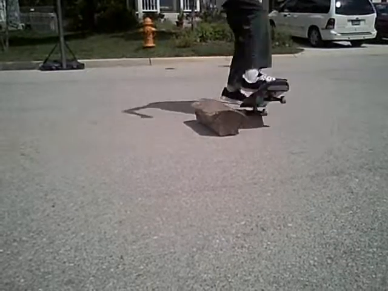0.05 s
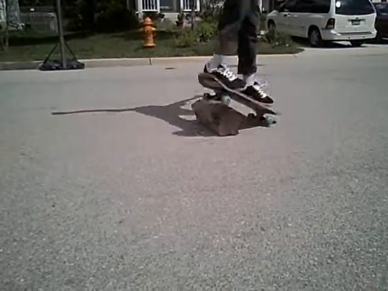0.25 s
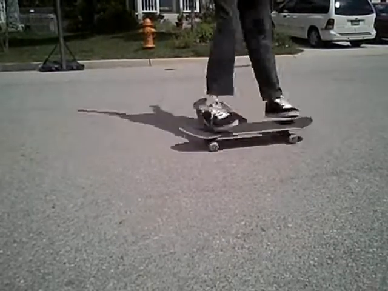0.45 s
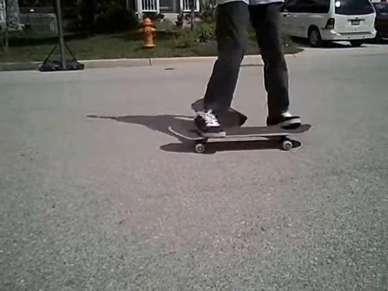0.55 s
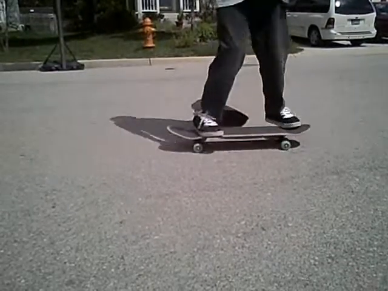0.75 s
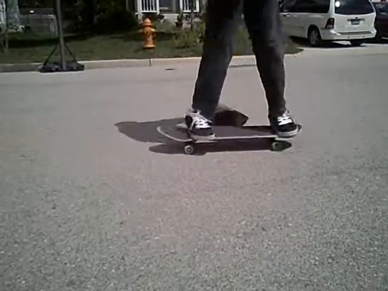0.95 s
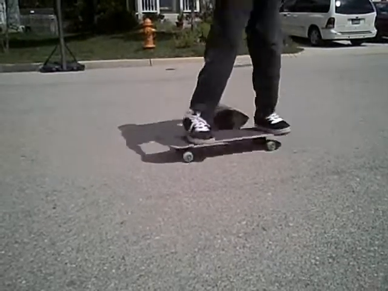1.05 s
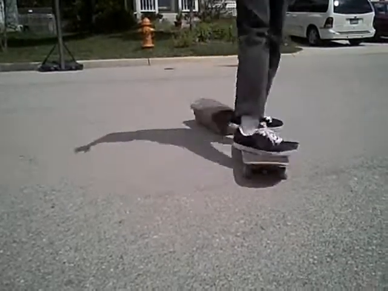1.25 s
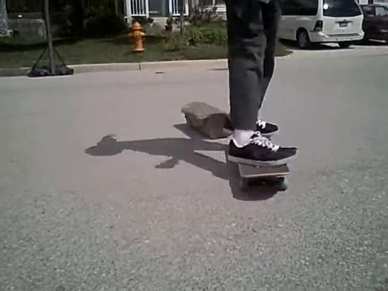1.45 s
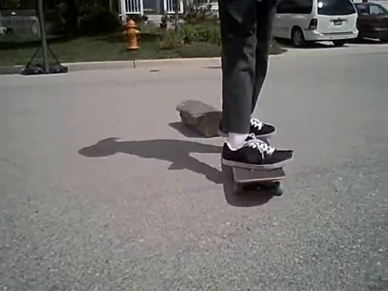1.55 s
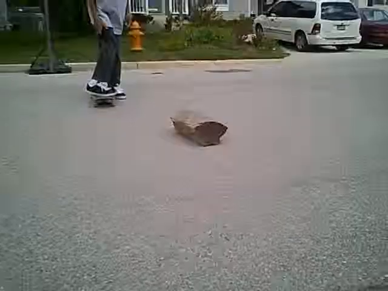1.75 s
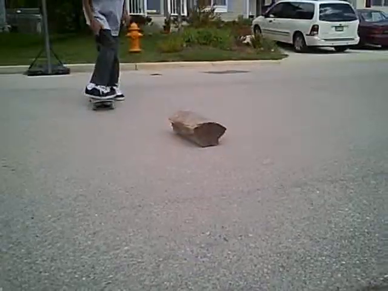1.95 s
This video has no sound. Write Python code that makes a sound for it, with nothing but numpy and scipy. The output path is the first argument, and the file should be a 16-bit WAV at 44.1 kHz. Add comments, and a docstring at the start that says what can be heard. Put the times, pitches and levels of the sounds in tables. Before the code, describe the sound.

A skateboard clacks against a log, slams down, skids and rolls on over gritty asphalt.

```python
"""Skateboard at a log, asphalt street.

Close on one small microphone, a board rolls up to a log, clacks against it, slams down and skids round. It
rolls on slowly over crackling grit, knocks twice more and carries on. Every contact is a rattle of tiny impacts
that rings the wooden deck, and the big hits overload the microphone. Behind it is a faint echo off houses and
parked cars, and throughout runs the low hum of a small motor."""
import sys
import numpy as np
from scipy import signal
from scipy.fft import rfft, irfft
from scipy.io import wavfile

SR = 44100
rng = np.random.default_rng(int(sys.argv[2]) if len(sys.argv) > 2 else 0)


def transcribe(signal):
    """Save signal, clipped to [-1, 1], as a 16-bit WAV file at the path in sys.argv[1]."""
    frames = np.atleast_2d(signal).T
    limited = np.clip(frames, -1, 1)
    pcm = np.round(limited * 32767).astype(np.int16)
    wavfile.write(sys.argv[1], SR, pcm)


N = 88200
TOP_HZ = 15650  # upper edge of the microphone's range

# low modes of the wooden deck (frequency [Hz], relative level [dB], t60 [s])
DECK_MODES = [(255, -1, 0.039), (333.2, -5, .04), (428, 1.5, 0.06), (566.6, 3, 0.052), (660, -5.5, 0.025),
              (840, -6, 0.08), (924, 1.5, 0.077), (968, -1, 0.041), (1067, -1, 0.055), (1173, -5.5, 0.08),
              (1290, -9, .06)]
# high modes of deck and trucks (frequency [Hz], relative level [dB], t60 [s])
CLACK_MODES = [(1560, -5.5, 0.066), (1680, -6, 0.099), (1884.5, -4, 0.098), (1966, -0.5, 0.048),
               (2099, 1.5, 0.023), (2140, -3, 0.033), (2430, -1.5, 0.021), (2820, -22, .05),
               (2705, -5.5, 0.03), (2930, -9.5, .05), (3312, -7, .06), (3410, -12.5, .04),
               (4660, -15.5, .04)]
# board and rider bouncing on the wheels (frequency [Hz], relative level [dB], t60 [s])
THUD_MODES = [(137, -3.5, 0.042), (165, -2, .07), (231.6, 10, 0.023)]
# spectrum of skidding and of cracking stones (frequency [Hz], relative level [dB])
SKID_COLOUR = [(60, -20), (150, -6), (350, -14.5), (560, -3.5), (750, -8), (1300, -6.5), (2000, -1),
               (3300, 1), (5000, 2.5), (8000, 0), (10000, -6), (15000, -4)]


def knocks():
    """Each blow, one hard contact and a dying rattle, rings the board and thuds on the wheels."""
    # blows on the board (time [s], crack [dB], deck ring [dB], clack [dB], thud [dB], rattle decay [s])
    blows = [(.203, -33, -33, -37, -39, 0.0052), (0.2119, -27, -48, -44, -21, 0.0046),
             (.223, -16, -17.5, -23, -38, 0.036), (.237, -6, -17, -2.5, -14, 0.0053),
             (0.25, -8.5, -17.5, -6.5, -30, 0.005), (.257, -7.5, -30, -15, -34.5, 0.0035),
             (0.28, -30.5, -22.5, -47.5, -45.5, 0.0034), (0.2999, -4, -19, -23, -29.5, 0.005),
             (0.4221, 0.5, -2, -9.5, -31, 0.015), (.4385, -4.5, -11, -15, -10.5, 0.0051),
             (0.4544, -5, -40, -39.5, -14.5, .007), (.497, -16, -20.5, -30, -34, 0.016),
             (0.511, -5, -27.5, -13, -17.5, 0.0017), (0.561, -19, -39.5, -20.5, -53, 0.015),
             (.632, -10.5, -18.5, -20.5, -16.5, 0.013), (0.652, -9.5, -22.5, -32, -30, 0.0028),
             (0.672, -15.5, -27, -28, -34, 0.0071), (1.0369, -33.5, -26, -36, -36.5, .005),
             (1.074, -28, -44.5, -37.5, -44, .008), (1.302, -15.5, -26, -38, -35, 0.0025),
             (1.385, -14.5, -28.5, -44, -19, 0.0089), (1.392, -17.5, -52, -28, -18.5, 0.0096),
             (1.406, -14.5, -22, -42, -24, 0.0065), (1.419, -31, -30, -31, -32, 0.0034)]
    # spectrum of the crack (frequency [Hz], relative level [dB])
    crack_colour = [(100, -25.5), (400, -3.5), (1000, 1.5), (2000, -2), (3200, -2), (4800, -1), (8000, 2),
                    (10000, -4.5), (12000, -1), (15000, -2.5)]
    contact_s = 0.0026  # the first contact carries as much energy as this much rattle
    rattle = grains(rate=9800, spread_db=0.5)
    forces = np.zeros((4, N))
    for start, *levels_db, decay in blows:
        burst = rattle * envelope(start, attack=.001, hold=.001, release=decay)
        contact = np.zeros(N)
        contact[int(start * SR)] = np.sqrt(contact_s * SR)
        drives = [burst, contact + 0.53 * burst, contact + 0.84 * burst, 0.75 * contact + 0.1 * burst]
        forces += undb(levels_db)[:, None] * np.array(drives)
    crack, deck, clack, thud = forces
    body = ring(deck, DECK_MODES) + ring(clack, CLACK_MODES) + ring(thud, THUD_MODES)
    return deck_blur(flicker(colour(crack, crack_colour))) + body


def scrapes():
    """Dragged sideways, wheels and deck catch and slip in quick uneven bursts."""
    # skids (start [s], hold [s], level [dB], release [s])
    skids = [(0.29, .025, -19, .003), (0.386, .011, -31, 0.0022), (0.483, 0.037, -27, 0.04),
             (.577, 0.033, -4, 0.02), (0.745, 0.0063, -24.5, 0.0034), (1.009, 0.049, -35.5, 0.0069),
             (1.213, 0.014, -31.5, 0.0012)]
    pressure = sum(undb(db) * envelope(start, 0.001, hold, release) for start, hold, db, release in skids)
    slips = pressure * grains(rate=11000, spread_db=4.0) * undb(1.3 * wander(300))
    deck = undb(-18.5) * ring(slips, DECK_MODES)
    clack = undb(-17) * ring(slips, CLACK_MODES)
    thud = undb(-27.5) * ring(slips, THUD_MODES)
    return deck_blur(flicker(colour(slips, SKID_COLOUR))) + deck + clack + thud


def rider_thump():
    """The rider's foot lands on the ground: one soft push into a single low resonance."""
    push = envelope(start=.503, attack=0.0014, hold=0, release=0.00071)
    return undb(-17.5) * ring(push, [(105, 0, .04)])


def rolling():
    """Wheels crunch over the grit on the asphalt and shake the board."""
    # grit crunching under the wheels (time [s], level [dB])
    crunch_levels = [(0, -25), (.06, -28.5), (.12, -22.5), (.15, -36), (.22, -20.5), (.33, -37.5),
                     (.37, -49), (.70, -30), (.83, -53.5), (.91, -39.5), (.97, -61), (1.06, -47.5),
                     (1.16, -31.5), (1.245, -46.5), (1.29, -51), (1.36, -47), (1.45, -36.5), (1.58, -32.5),
                     (1.76, -44), (1.85, -48.5)]
    # the wheels' rumble in the board (time [s], level [dB])
    rumble_levels = [(0, -28.5), (.13, -31), (.21, -27), (.33, -51), (.38, -38.5), (.6, -36), (.76, -53),
                     (.97, -54.5), (1.16, -49), (1.33, -55.5), (1.5, -49), (1.85, -42)]
    # spectrum of the grit (frequency [Hz], relative level [dB])
    grit_colour = [(100, -17.5), (700, -1.5), (1400, -5), (2200, 2), (2800, -0.5), (4000, 3.5), (6000, 0.5),
                   (8000, 4), (10000, -5.5), (12000, 2.5), (15000, -4.5)]
    # resonances of the rolling board (frequency [Hz], relative level [dB], t60 [s])
    roll_modes = [(170, -0.5, 0.23), (218, -2.5, 0.23), (301, -1.5, 0.02), (474.6, -6, 0.05),
                  (588, -0.5, 0.024), (853, -9, 0.038), (1040, -7.5, 0.016), (1930, -5.5, 0.023)]
    crunch = level_curve(crunch_levels) * grains(rate=11000, spread_db=5.5) * undb(1.4 * wander(200))
    bumps = level_curve(rumble_levels) * grains(rate=2500, spread_db=4.5)
    grit = deck_blur(flicker(colour(crunch, grit_colour)))
    return grit + undb(-20.5) * ring(crunch, CLACK_MODES) + ring(bumps, roll_modes)


def stones():
    """Single stones crack under a wheel, each a tiny crunch around its own pitch."""
    # cracking stones (time [s], level [dB], pitch [Hz])
    cracks = [(0.777, -27, 5760), (1.044, -23.5, 4950), (1.06, -35, 6700), (1.094, -51, 5500),
              (1.1137, -36, 4630), (1.178, -22.5, 6500), (1.192, -30, 4600), (1.2557, -31, 2170),
              (1.259, -26.5, 6460), (1.302, -17, 6620), (1.3263, -30, 1250), (1.498, -26.5, 4260),
              (1.568, -25.5, 4500), (1.639, -28.5, 7000), (1.664, -31, 6040), (1.7038, -28.5, 1440),
              (1.7255, -31.5, 5730), (1.802, -30, 6000), (1.811, -25, 1600), (1.822, -25.5, 5600)]
    ring_cycles = 5.9  # to fall by 60 dB
    chips = grains(rate=23000, spread_db=-1)
    out = np.zeros(N)
    for start, db, hz in cracks:
        crack = undb(db) * chips * envelope(start, attack=0.00042, hold=0.00089, release=0.0027)
        out += undb(-4) * ring(crack, [(hz, 0, ring_cycles / hz)])
        out += undb(-5) * colour(crack, SKID_COLOUR)
    return out


def wheel_whirrs():
    """A urethane wheel slipping sideways rings in one narrow band."""
    # wheel slips (start [s], hold [s], pitch [Hz], level [dB])
    slips = [(0.013, 0.038, 190, -30.5), (.06, 0.029, 290, -31.5), (0.105, 0.044, 603, -31),
             (0.671, .014, 590, -27.5), (0.731, 0.011, 3870, -32), (1.098, 0.053, 2000, -43),
             (1.169, 0.013, 1910, -38), (1.359, .038, 4720, -41.5), (1.444, 0.029, 3320, -38),
             (1.527, 0.056, 2900, -41.5)]
    ring_cycles = 14  # to fall by 60 dB
    rub = rng.standard_normal(N)
    return sum(undb(db) * ring(rub * envelope(start, .008, hold, .005), [(hz, 0, ring_cycles / hz)])
               for start, hold, hz, db in slips)


def deck_blur(x):
    """The deck's dense upper modes add a short blur after each contact."""
    # spectrum of those modes (frequency [Hz], relative level [dB])
    blur_colour = [(600, -13.5), (1800, 0.5), (4000, 0.5), (15000, -2.5)]
    blur_db, t60_s = -10.5, 0.063
    tail = rng.standard_normal(N) * envelope(0, .0005, 0, t60_s / np.log(1000))
    response = colour(tail, blur_colour)
    response *= undb(blur_db) / np.sqrt(np.sum(response ** 2))
    response[0] += 1  # the contact itself
    return through(x, response)


def flicker(x, bands=12, depth_db=5.5, rate_hz=169.97):
    """Each tiny contact has its own pitch, so the bands swell and fade separately."""
    band_position = np.sqrt(np.fft.rfftfreq(N, 1 / SR) / TOP_HZ) * (bands - 1)
    spectrum, out = rfft(x), np.zeros(N)
    for k in range(bands):
        band = irfft(spectrum * np.maximum(1 - abs(band_position - k), 0), N)
        gain = undb(depth_db * wander(rate_hz))
        out += band * gain / np.sqrt(np.mean(gain ** 2))
    return out


def street_echo(x, delay_s=0.017, t60_s=.35):
    """Faint dull scatter comes back to the microphone from houses and parked cars."""
    tail = rng.standard_normal(N) * envelope(delay_s, 0.0073, 0.0093, t60_s / np.log(1000))
    return undb(-31.5) * through(x, colour(tail, [(100, -3.5), (2000, -3), (10000, -12)]))


def motor_hum(turning_hz=18.85):
    """A small motor hums at multiples of its nearly steady turning rate."""
    # partials of the hum (multiple of the turning rate, relative level [dB])
    partials = [(2, -6.5), (3, -10.5), (4, 0), (5, -5), (6, -12), (7, -40.5), (8, -5), (9, -11.5),
                (10, -11.5), (12, -20)]
    turns = np.cumsum(turning_hz * (1 + 0.0017 * wander(5.6))) / SR
    hum = sum(undb(db) * np.sqrt(2) * np.sin(2 * np.pi * (k * turns + rng.random())) for k, db in partials)
    return undb(-43) * hum


def street_noise():
    """The street's ambience: faint, steady and mostly low."""
    # spectrum of the street (frequency [Hz], relative level [dB])
    street_colour = [(20, -11.5), (80, -8.5), (170, -9), (250, -15.5), (700, -26), (2000, -27), (6000, -39),
                     (15000, -33.5)]
    return undb(-45) * colour(rng.standard_normal(N), street_colour)


def undb(db):
    """Decibels to gain."""
    return 10 ** (np.asarray(db) / 20)


def level_curve(points):
    """Gain that follows (time [s], level [dB]) points."""
    return undb(np.interp(np.arange(N) / SR, *np.array(points).T))


def envelope(start, attack, hold, release):
    """Straight rise, then exponential fall from `hold` after the start; all in seconds."""
    t = np.arange(N) / SR - start
    return np.clip(t / attack, 0, 1) * np.exp(-np.maximum(t - hold, 0) / release)


def wander(rate):
    """Random drift through `rate` points a second, with a spread near 1."""
    return np.interp(np.arange(N) / SR * rate, np.arange(N), rng.standard_normal(N))


def grains(rate, spread_db):
    """Tiny random impacts of uneven size, about `rate` a second, rms 1."""
    hits = rng.random(N) < rate / SR
    signs = rng.choice([-1, 1], N)
    sizes = undb(spread_db * np.minimum(rng.exponential(size=N), np.log(50)))
    impacts = hits * signs * sizes
    return impacts / np.sqrt(np.mean(impacts ** 2))


def through(x, response):
    """Pass a sound through a response scaled to unit energy."""
    return signal.fftconvolve(x, response / np.sqrt(np.sum(response ** 2)))[:N]


def colour(x, points, size=2048):
    """Causal filter shaped by (frequency [Hz], relative level [dB]) points."""
    hz, db = np.array(points).T
    f = np.maximum(np.fft.rfftfreq(size, 1 / SR), 1)
    gain = undb(np.interp(np.log(f), np.log(hz), db))
    cepstrum = irfft(np.log(gain))
    cepstrum[1:size // 2] *= 2  # fold to minimum phase
    cepstrum[size // 2 + 1:] = 0
    return through(x, irfft(np.exp(rfft(cepstrum))))


def ring(x, modes):
    """Drive damped modes given as (frequency [Hz], share of the energy [dB], t60 [s])."""
    t = np.arange(SR // 2) / SR
    response = np.zeros(len(t))
    for k, (hz, db, t60) in enumerate(modes):
        amplitude = (-1) ** k * undb(db) / np.sqrt(t60)
        response += amplitude * np.sin(2 * np.pi * hz * t) * np.exp(-np.log(1000) * t / t60)
    return through(x, response)


def scene():
    """The board up close, with its echo and the street behind it, and the motor's hum, in mono."""
    board = knocks() + rider_thump() + scrapes() + rolling() + stones() + wheel_whirrs()
    return (board + street_echo(board) + motor_hum() + street_noise())[None]


def record(dry):
    """A small microphone, dull on top, overloads on big hits; the sound stops abruptly, leaving hiss."""
    treble_step_hz, treble_step_db = 8650, -12.5
    drive_db, low_cut_hz, end_s = 1, 39, 1.849
    f = np.fft.rfftfreq(N, 1 / SR)
    above_step = np.clip((f - treble_step_hz) / 210 + .5, 0, 1)  # the step is 210 Hz wide
    dull = irfft(rfft(dry) * undb(treble_step_db * above_step), N)
    clipped = np.clip(undb(drive_db) * dull, -1, 1)
    gated = clipped * envelope(0, attack=0.0003, hold=end_s, release=0.00164)
    low_cut = signal.butter(2, low_cut_hz, "high", fs=SR, output="sos")
    high_cut = signal.ellip(10, .2, 70, TOP_HZ, fs=SR, output="sos")
    hiss = undb(-68.5) * colour(rng.standard_normal(N), [(50, -1.5), (300, -20), (8000, -22), (10000, -37)])
    return signal.sosfilt(high_cut, signal.sosfilt(low_cut, gated) + hiss)


dry = scene()
out = record(dry)
transcribe(out)
```